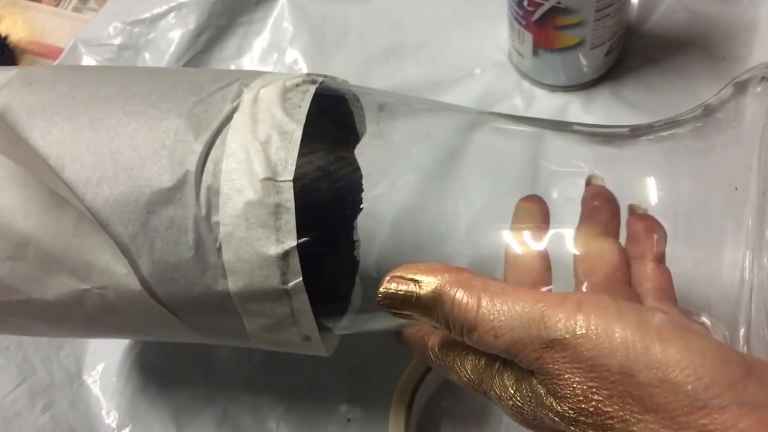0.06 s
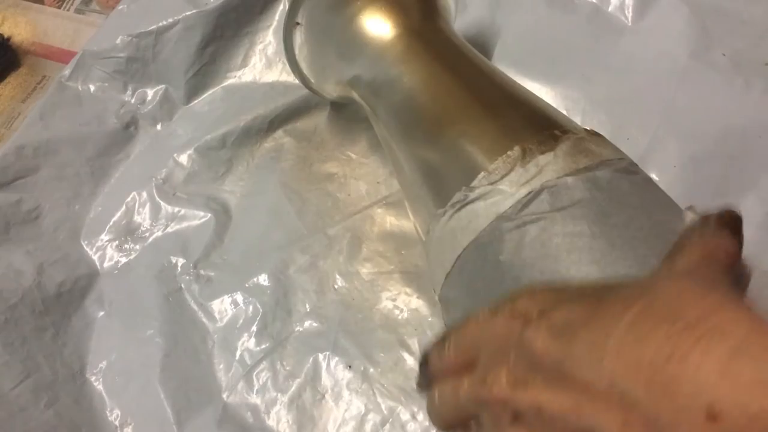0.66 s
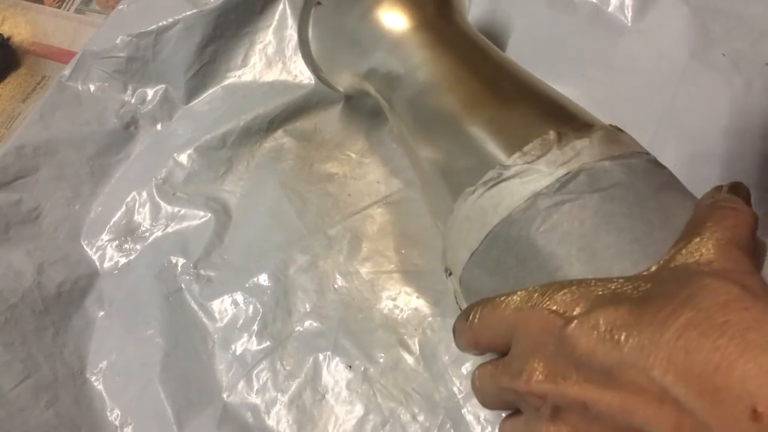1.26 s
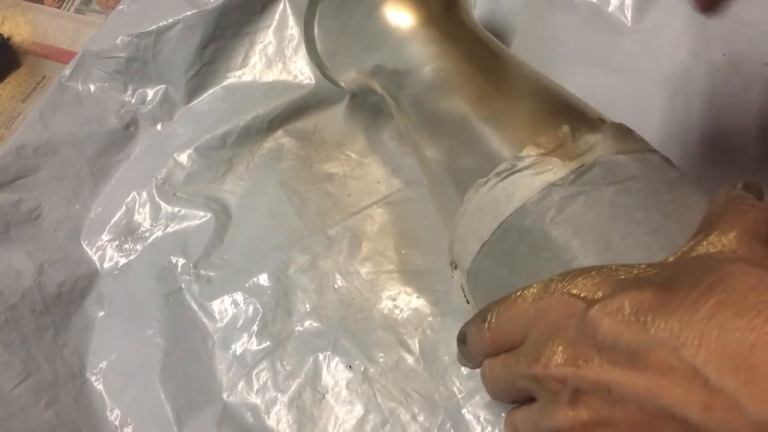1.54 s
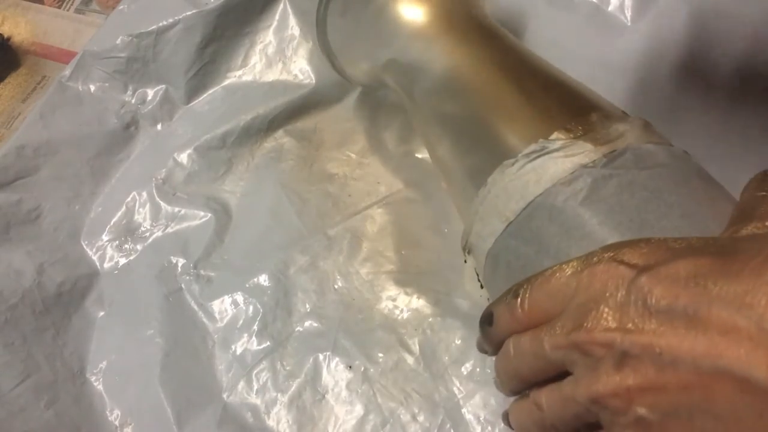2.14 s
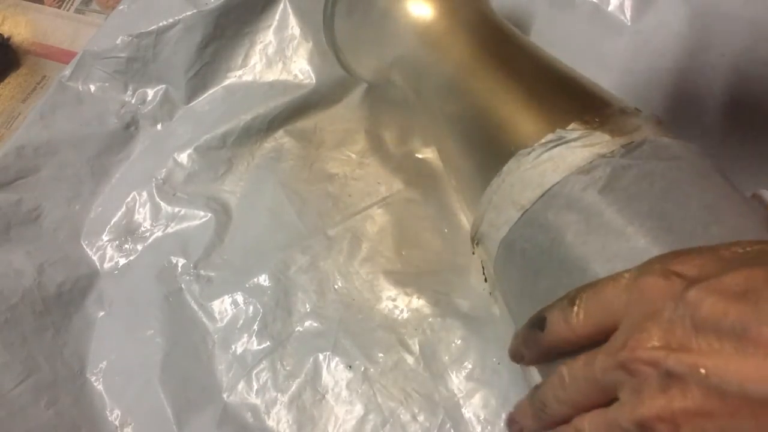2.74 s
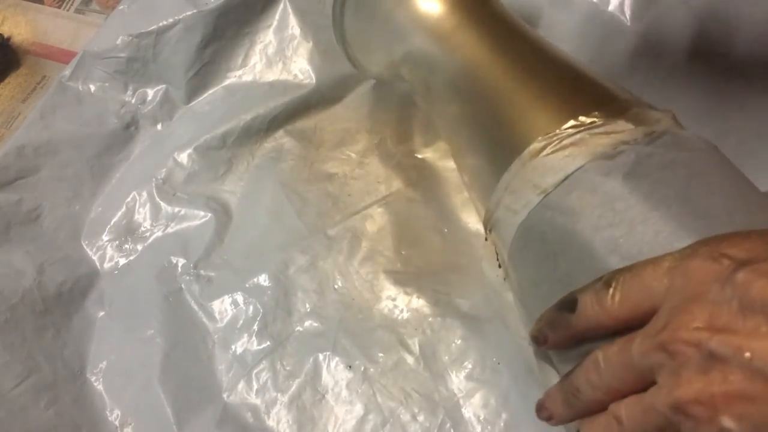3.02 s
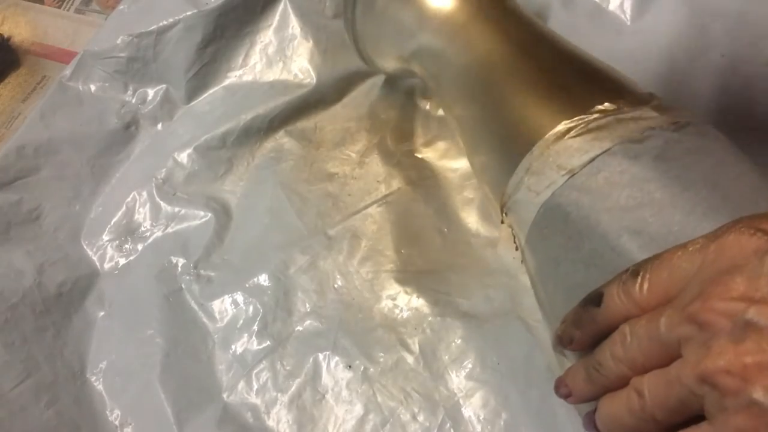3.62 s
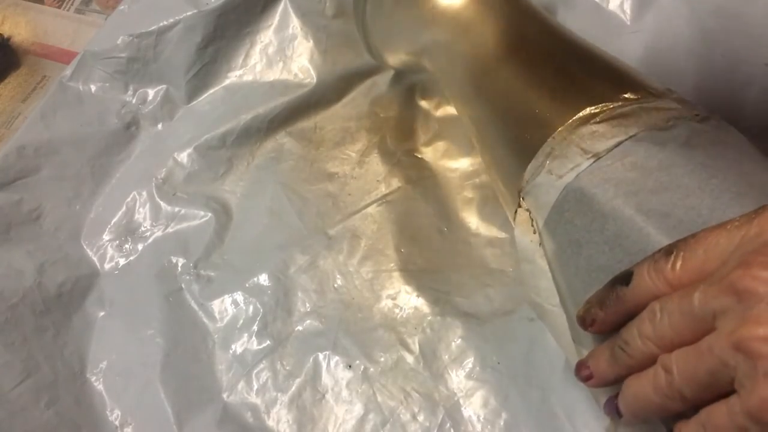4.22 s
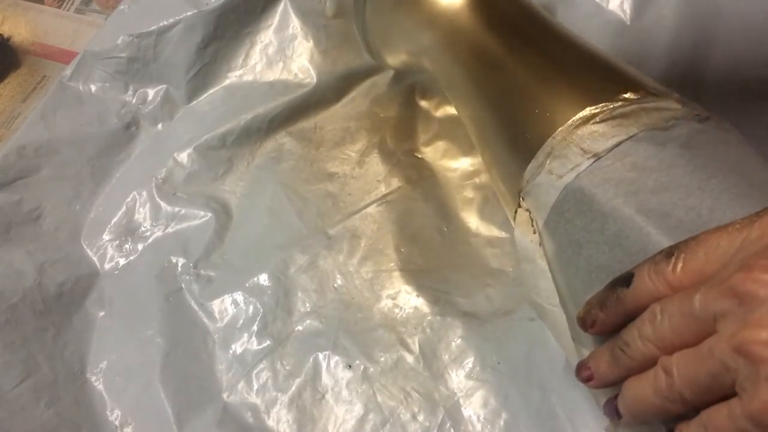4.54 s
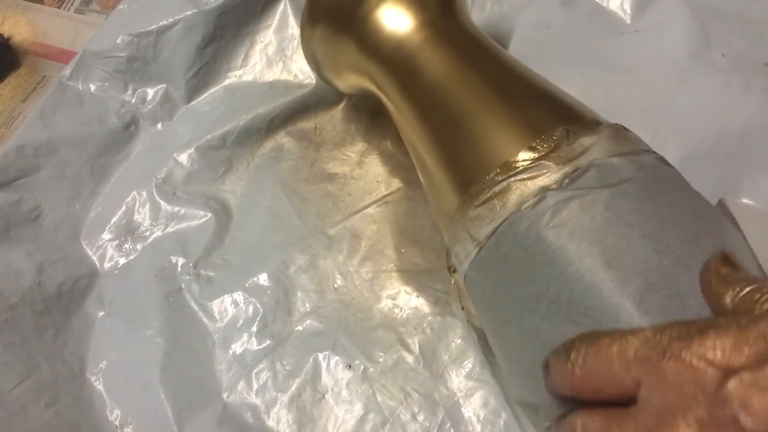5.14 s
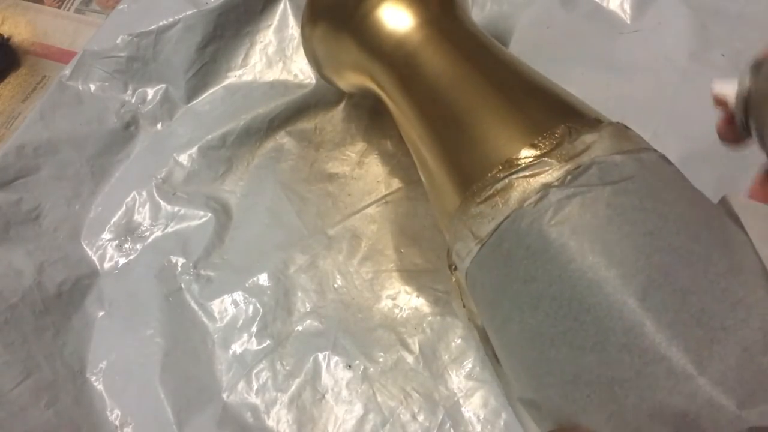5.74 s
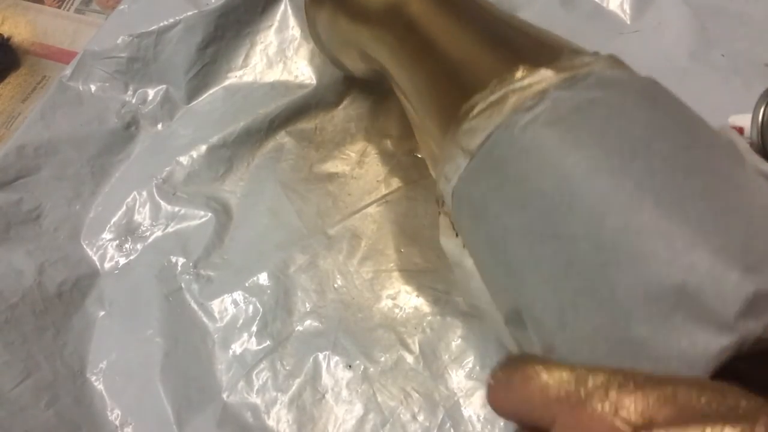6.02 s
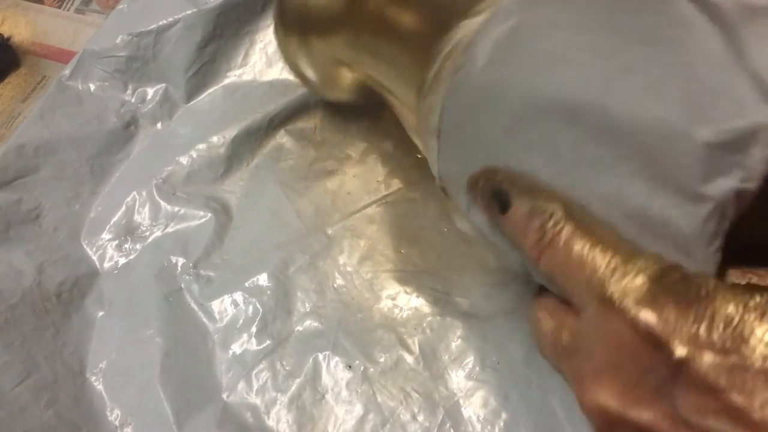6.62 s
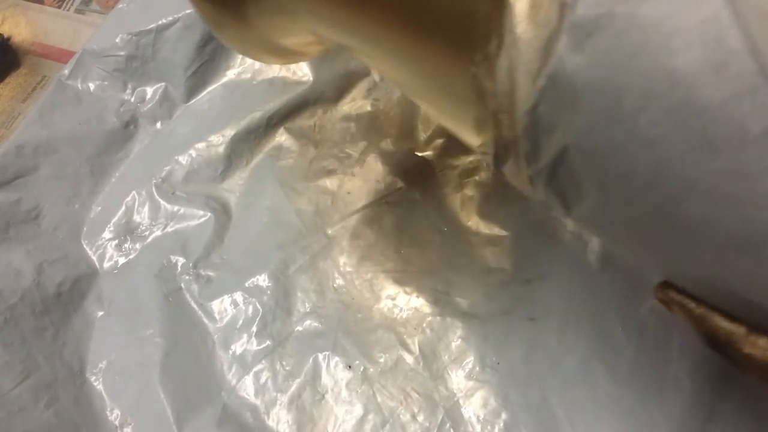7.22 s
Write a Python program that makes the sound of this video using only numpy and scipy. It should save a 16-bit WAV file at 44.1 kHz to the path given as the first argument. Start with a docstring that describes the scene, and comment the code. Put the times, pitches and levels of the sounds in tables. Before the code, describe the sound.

Paper and plastic crinkle softly as a wrapped glass vase is handled. A spray paint can then hisses steadily for about three seconds, its mixing ball clicking inside while creases snap sharply. After the spray cuts off, the ball rattles and rolls, and the vase is turned with more rustling and a few soft bumps on the table. The microphone is close, in a small, quiet room.

```python
"""A small workroom, one mono microphone close to a glass vase in a paper sleeve on a plastic sheet.
The vase gets one long burst of spray paint: the jet hisses, and echoes off nearby surfaces shift its
colour as the hand sweeps. The mixing ball knocks, bounces and rolls, ringing the can. As the vase is
turned, paper and plastic creases snap and rustle, and it bumps softly on the table. Faint room rumble
and mains hum lie underneath; early on, the sound drops out for a moment."""
import sys
import numpy as np
from scipy import signal
from scipy.fft import rfft, irfft, next_fast_len
from scipy.io import wavfile
from scipy.ndimage import uniform_filter1d, map_coordinates

SR = 44100
rng = np.random.default_rng(int(sys.argv[2]) if len(sys.argv) > 2 else 0)


def transcribe(signal):
    """Save signal, clipped to [-1, 1], as a 16-bit WAV file at the path in sys.argv[1]."""
    frames = np.atleast_2d(signal).T
    limited = np.clip(frames, -1, 1)
    pcm = np.round(limited * 32767).astype(np.int16)
    wavfile.write(sys.argv[1], SR, pcm)


N = 320607
TIME = np.arange(N) / SR

# spectra of the quiet room, crinkling creases, rubbing and the rumbling sleeve: f/Hz, relative level/dB
ROOM_SPECTRUM = [(25, -25), (38, -9.5), (52, -1), (80, -2), (120, -7.5), (170, -7), (260, -16.5),
                 (380, -23.5), (450, -13.5), (540, -24.5), (1400, -28), (2800, -35.5), (6000, -38.5),
                 (10000, -40.5), (16000, -43)]
CRINKLE_SPECTRUM = [(710, -26), (1200, 4), (2510, -1), (3180, 3.5), (4960, 1.5), (6370, -2.5), (8720, -1),
                    (10500, -11), (13600, -7), (16000, -17)]
RUB_SPECTRUM = [(250, -3), (450, -6.5), (700, 3.5), (1000, 7), (1400, 2), (2200, 0), (4000, -4.5)]
SLEEVE_SPECTRUM = [(100, -14), (170, -7.5), (250, -3.5), (330, 1.5), (420, -8), (600, -13), (1200, -16)]
# soft bumps on the table: t/s, level/dB, thump f/Hz, hollow knock trim/dB
BUMPS = [(0.402, -39.5, 137, -9), (0.88, -39.5, 114, -21.5), (5.547, -38.5, 133, -30),
         (6.239, -36.5, 330, -2.5), (6.355, -31, 307, -7)]
# the hand grips, shifts or turns the vase: start/s, end/s, sliding level/dB, relative weight/dB
HAND_MOVES = [(0.6, 0.688, -67.5, -1), (0.722, 0.747, -57, -4), (0.844, 1.079, -58, 1),
              (1.141, 1.199, -62, 0), (1.402, 1.489, -72, 0), (4.772, 4.863, -63, 4),
              (4.918, 5.132, -60, 3), (5.254, 5.328, -60.5, 2), (5.402, 5.618, -67.5, 1.5),
              (5.695, 5.878, -54.5, -3), (5.9, 6.12, -50.5, 1), (6.224, 6.259, -52.5, 6),
              (6.309, 6.36, -43.5, -1.5), (6.392, 6.56, -44, 0), (6.59, 6.7, -45, -0.5),
              (6.774, 6.839, -57, 0), (6.9, 7.031, -63.5, 4), (7.089, 7.248, -60, 3)]
# short scrapes of the sleeve, and one brief dull knock (last row): t/s, level/dB, length/s, f/Hz
SCRAPES_AND_KNOCK = [(0.729, -47, 0.022, 2180), (2.737, -33.5, 0.019, 3360), (5.276, -44.5, 0.046, 2000),
                     (6.16, -51.5, 0.15, 5460), (6.633, -34, 0.011, 860)]
# the main snaps of paper and plastic creases: t/s, level/dB, panel f/Hz, relative treble/dB
SNAPS = [(0.687, -44.5, 2285, -3.5), (0.701, -41, 2000, -7), (0.721, -39.5, 2165, -8),
         (0.734, -40.5, 2150, 1), (0.793, -34, 1960, 2.5), (0.883, -30.5, 4440, -3.5),
         (0.973, -32, 3830, -5), (1.052, -40, 6420, 10.5), (1.075, -37, 6090, 0), (1.15, -36, 2210, -5),
         (1.205, -38.5, 4050, -10), (1.23, -43.5, 4060, -15), (1.31, -47, 5600, -7.5),
         (1.366, -44.5, 2000, -25.5), (1.419, -43, 2050, -4.5), (1.461, -38.5, 3720, -13),
         (3.31, -13, 3870, 0.5), (3.563, -15.5, 4100, -25), (3.593, -20, 4180, -11),
         (3.615, -22, 4200, -4.5), (3.917, -20, 4400, -1), (3.948, -18.5, 5520, -7),
         (4.118, -18.5, 3360, -11), (4.176, -21, 3840, -20), (4.262, -16, 3080, -4),
         (4.433, -14.5, 3800, -3), (4.5, -22, 3730, -10), (4.577, -10.5, 3910, -1),
         (5.017, -39.5, 2240, -1.5), (5.102, -22.5, 3200, -3), (5.124, -32.5, 3530, -4),
         (5.171, -28.5, 3080, -0.5), (5.219, -39, 3520, -1), (5.809, -28.5, 1980, -8),
         (5.848, -28, 3810, -4.5), (5.894, -11.5, 5820, -3), (5.973, -32.5, 3200, -7.5),
         (6.0, -20.5, 7200, -5), (6.031, -22.5, 5550, -14.5), (6.062, -24.5, 5580, -8.5),
         (6.087, -28.5, 4100, 1.5), (6.099, -19, 4200, -6), (6.124, -35, 3010, 9.5),
         (6.145, -26.5, 5760, -13), (6.168, -30, 5620, -20), (6.301, -29, 8300, 3.5),
         (6.311, -28, 6660, -1), (6.319, -18, 7030, -7), (6.334, -30.5, 8780, 9), (6.354, -28.5, 8310, 1.5),
         (6.415, -26.5, 2000, 1.5), (6.423, -29.5, 8490, 4), (6.452, -32, 3520, 4),
         (6.521, -28.5, 5640, 9.5), (6.527, -25, 8630, -3), (6.555, -30.5, 3220, 1),
         (6.563, -26.5, 3100, 0), (6.657, -24.5, 8530, 0), (6.673, -23.5, 3320, -3), (6.715, -24, 6760, -3),
         (6.807, -37.5, 4200, 5), (6.844, -35, 3300, 1.5), (6.91, -40.5, 3980, -4),
         (7.073, -35.5, 4230, -4), (7.101, -35.5, 2680, -11), (7.213, -38.5, 1910, -19)]
# modes of the can: f/Hz, relative level/dB, t60/s before extra damping
CAN_MODES = [(960, -5, 0.053), (1270, -7, 0.038), (1590, -40, 0.013), (1728, 6.5, 0.05), (1850, 8.5, 0.022),
             (2170, -8, 0.048), (2430, -6.5, 0.038), (2800, -43, .012), (3490, -7, 0.012)]
# the ball rolls round the bottom of the can: start/s, end/s, level/dB
BALL_ROLLS = [(4.943, 5.801, -57), (5.9, 5.966, -54), (7.131, 7.27, -58.5)]
# the ball hits the can: t/s, level/dB, low mode trim/dB, tick trim/dB
BALL_KNOCKS = [(2.11, -30, -15, -9), (2.13, -30.5, -14, -13), (2.286, -36.5, -20, -3),
               (2.442, -34, -22, -7), (2.619, -31.5, -9, -12), (2.959, -27, 0, -12), (2.985, -30, -6, -9),
               (3.444, -19.5, -5.5, -15), (3.641, -24, -11, -7.5), (3.783, -16.5, 1, -12.5),
               (4.307, -25.5, -8, -9), (4.65, -24.5, -12, -14), (4.726, -21.5, 2, -11.5),
               (4.766, -27.5, -9.5, -12), (5.308, -20.5, -23, -5), (5.992, -25, -32, -7),
               (6.885, -30.5, -12.5, -5.5), (6.956, -29.5, -24, -3.5), (6.979, -33.5, -18, -15),
               (7.014, -31.5, -1.5, -7.5), (7.075, -34.5, -8, -21)]
# the ball bounces to rest: t/s, level/dB, low mode trim/dB, tick trim/dB, first gap/s, share of speed kept
BALL_RATTLES = [(4.828, -29, -8.5, -13, .035, .77), (5.357, -23, -19, -10.5, .049, .68)]
# spectra of the nozzle's hiss, the jet's rush and the paint's spatter: f/Hz, relative level/dB
NOZZLE_SPECTRUM = [(5000, -24), (6400, -5), (7200, -2.5), (8000, -5), (9000, -5), (10400, -6.5), (11100, 0),
                   (12000, 1.5), (13200, 1), (14500, 3), (16000, -7)]
RUSH_SPECTRUM = [(250, -11.5), (420, -14), (560, -18), (900, -8.5), (1250, -5), (1500, -8.5), (1880, -5),
                 (2200, -4.5), (2750, -5), (3250, 2.5), (4050, -0.5), (4600, -13), (6000, -13.5),
                 (9000, -16)]
SPATTER_SPECTRUM = [(3000, -30), (4400, -10), (5000, -19.5), (5600, -8.5), (6200, -27), (7000, -14),
                    (10000, -51)]
# where the jet points: t/s, aim from 0 (bare glass) to 1 (edge of the paper)
JET_AIM = [(1.7, 0.95), (2.2, 0.65), (2.8, 0.039), (3.4, 0.81), (3.85, 0.3), (4.1, .8), (4.7, 0.92)]
# echoes off surfaces beside the jet: delay/ms, gain, swing of the delay/ms
JET_ECHOES = [(.24, .3, .045), (.5, .3, .07), (.84, .38, .05), (1.17, .42, .05), (1.7, .22, .1)]

VALVE_OPEN_S, VALVE_SHUT_S = 1.516, 4.742
SOFT_SNAP_DB, SOFT_TICK_DB = -35, -11  # harder snaps and knocks change colour relative to these


def from_db(db):
    """Decibels to gain."""
    return 10 ** (np.asarray(db) / 20)


def rms_one(x):
    """Scale to unit rms."""
    return x / np.sqrt(np.mean(x ** 2) + 1e-20)


def crest_one(x):
    """Scale so that the loudest millisecond has unit rms."""
    return x / np.sqrt(uniform_filter1d(x ** 2, SR // 1000).max() + 1e-20)


def colour(x, spectrum):
    """Causal filter with the given spectrum, falling away past its ends; unit rms out."""
    size = next_fast_len(N + 4096)
    hz, db = np.transpose(spectrum)
    octave = np.log2(np.maximum(np.arange(size // 2 + 1) * SR / size, 1))
    octaves_outside = abs(octave - np.clip(octave, np.log2(hz[0]), np.log2(hz[-1])))
    gain = from_db(np.interp(octave, np.log2(hz), db) - 20 * np.minimum(octaves_outside, 2))
    cepstrum = irfft(np.log(gain), size)
    cepstrum[size // 2:] = 0  # minimum phase
    return rms_one(irfft(rfft(x, size) * np.exp(2 * rfft(cepstrum)), size)[:N])


def band(x, low_hz, high_hz):
    """Butterworth band-pass."""
    return signal.sosfilt(signal.butter(2, [low_hz, high_hz], "band", fs=SR, output="sos"), x)


def low_cut(x, hz):
    """Steep high-pass: small, light things radiate no bass."""
    return signal.sosfilt(signal.butter(4, hz, "high", fs=SR, output="sos"), x)


def ring(x, hz, t60):
    """Resonator: a unit click sets a sine of height 1 ringing."""
    radius, angle = from_db(-60 / (t60 * SR)), 2 * np.pi * hz / SR
    return signal.lfilter([0, np.sin(angle)], [1, -2 * radius * np.cos(angle), radius ** 2], x + 1e-18)


def noise(spectrum):
    """Steady noise with the given spectrum and unit rms."""
    return colour(rng.standard_normal(N), spectrum)


def drift(per_s):
    """Smooth random wander with unit rms."""
    knots = rng.standard_normal(2000)
    return rms_one(map_coordinates(knots, [TIME * per_s], order=2, mode="wrap"))


def grains(per_s, spread_db):
    """Random clicks of uneven size and sign."""
    sizes = from_db(spread_db * np.minimum(rng.exponential(1, N), 3.5))
    return (rng.random(N) < per_s / SR) * sizes * rng.choice([-1, 1], N)


def burst(decay_s, tail_db, tail_s, size=3000):
    """A sharp crack of noise with a weak tail; unit energy."""
    t = TIME[:size]
    x = rng.choice([-1, 1], size) * (np.exp(-t / decay_s) + from_db(tail_db) * np.exp(-t / tail_s))
    return x / np.linalg.norm(x)


def swell(start, end, rise_s, fall_s):
    """Gain that rises to 1 by the start, holds, and dies away after the end."""
    return np.exp(np.minimum(TIME - start, 0) / rise_s - np.maximum(TIME - end, 0) / fall_s)


def add(out, s, sound):
    """Mix a short sound in at time s."""
    at = int(s * SR)
    out[at:at + len(sound)] += sound[:N - at]


def room_tone(rumble_db=-61.5, hum_db=-64, hum_hz=100):
    """The room's own low rumble and mains hum."""
    hum = np.sqrt(2) * np.sin(2 * np.pi * hum_hz * TIME)
    return from_db(rumble_db) * noise(ROOM_SPECTRUM) + from_db(hum_db) * hum


def workroom(direct, t60=.18, tail_db=-17):
    """At close range the room adds only a weak, slightly dull diffuse tail."""
    t = TIME[:SR // 2]
    tail = band(rng.standard_normal(len(t)), 330, 15000) * from_db(-60 * t / t60) * (t > .004)
    return direct + from_db(tail_db) * signal.fftconvolve(direct, tail / np.linalg.norm(tail))[:N]


def table_bumps():
    """Dull contacts with the table: a low thump and a short hollow knock."""
    out = np.zeros(N)
    for s, db, hz, hollow_db in BUMPS:
        push = burst(decay_s=.007, tail_db=-22, tail_s=.015, size=6000)
        thump = from_db(-7) * crest_one(ring(band(push, 146, 570), hz, t60=.11))
        hollow = from_db(hollow_db + 3) * crest_one(band(push, 230, 410))
        add(out, s, from_db(db) * (thump + hollow))
    return out


def sheet_shake(soft_db=-61, decay_s=.014):
    """Gain of the rustle that each main snap leaves in the sheet, a little more after a hard one."""
    kicks = np.zeros(N)
    for s, db, _, _ in SNAPS:
        kicks[int(s * SR)] = from_db(soft_db + .23 * (db - SOFT_SNAP_DB))
    return signal.lfilter([1], [1, -np.exp(-1 / (decay_s * SR))], kicks + 1e-18)


def hand_effort():
    """Gains of the hand's sliding and of its weight on the sleeve, both on top of the sheet's shake."""
    slide = press = sheet_shake()
    for start, end, db, weight_db in HAND_MOVES:
        move = from_db(db) * swell(start, end, rise_s=.02, fall_s=.018)
        slide = slide + move
        press = press + from_db(weight_db) * move
    return slide, press


def handling():
    """Tiny creases crackle over a finer rustle while the sleeve rubs over the sheet and rumbles."""
    creases = grains(per_s=200, spread_db=3.5)
    crackle = signal.fftconvolve(creases, burst(decay_s=.0005, tail_db=-20, tail_s=.002))[:N]
    rustle = from_db(2.5 * drift(90)) * grains(per_s=3000, spread_db=3.5)
    crinkle = colour(rms_one(crackle) + .7 * rms_one(rustle), CRINKLE_SPECTRUM)
    rub = colour(from_db(3 * drift(70)) * grains(per_s=600, spread_db=3), RUB_SPECTRUM)
    rumble = colour(grains(per_s=300, spread_db=2.5), SLEEVE_SPECTRUM)
    slide, press = hand_effort()
    jerks = from_db(drift(45))  # the hand's pressure is uneven
    return slide * crinkle + press * jerks * (from_db(-3) * rub + from_db(-1.5) * rumble)


def scrapes_and_knock(q=4):
    """Short stick-slip rasps of the sleeve and one brief dull knock, each in one broad resonance."""
    clicks = grains(per_s=1400, spread_db=5.5)
    out = np.zeros(N)
    for s, db, length_s, hz in SCRAPES_AND_KNOCK:
        t60 = np.log(1000) * q / (np.pi * hz)
        resonance = rms_one(low_cut(ring(clicks, hz, t60), hz / 2))
        out += from_db(db) * np.exp(-(2 * (TIME - s) / length_s) ** 2) * resonance
    return out


def small_snaps(count=110, low_hz=2080, high_hz=8100, above_slide_db=9.5, spread_db=3.5, treble_db=-1):
    """Lesser creases give way at random, more often and louder as the hand speeds up; rows like SNAPS."""
    slide, _ = hand_effort()
    strain = np.cumsum(slide ** .6)
    when, strength, pitch = rng.random((count, 3)).T
    at = np.searchsorted(strain, (np.arange(count) + when) / count * strain[-1])
    db = 20 * np.log10(slide[at]) + above_slide_db + spread_db * (2 * strength - 1)
    hz = low_hz * (high_hz / low_hz) ** pitch
    return list(zip(at / SR, db, hz, np.full(count, treble_db)))


def crease_snaps():
    """A crease flips over: a broad crack, and the panel beside it rings briefly."""
    out = np.zeros(N)
    for s, db, hz, treble_db in list(SNAPS) + small_snaps():
        crack = burst(decay_s=.0004, tail_db=-7.5, tail_s=.0028)
        panel = from_db(1.5) * crest_one(ring(crack, hz, t60=.005))
        body = crest_one(crest_one(band(crack, 2530, 5900)) + panel)
        low = crest_one(band(burst(decay_s=.0038, tail_db=-29, tail_s=.002), 1230, 2520))
        treble = crest_one(band(burst(decay_s=.00068, tail_db=-5, tail_s=.0031), 4800, 13100))
        low_db = -9 - .39 * max(db - SOFT_SNAP_DB, 0)  # hard snaps are thinner
        add(out, s, from_db(db) * (body + from_db(low_db) * low + from_db(treble_db) * treble))
    return low_cut(out, 800)


def ball_rolling():
    """The rolling ball keeps the can's modes murmuring, and damps them by its touch."""
    contact = grains(per_s=2500, spread_db=1.5)
    modes = sum((-1) ** k * from_db(db) * ring(contact, hz, t60=.004)
                for k, (hz, db, _) in enumerate(CAN_MODES))
    speed = sum(from_db(db) * swell(start, end, rise_s=.032, fall_s=.062)
                for start, end, db in BALL_ROLLS)
    return speed * rms_one(band(modes, 900, 1780))


def ball_bounces(count=7):
    """The settling ball loses speed, so it hits ever sooner and softer; rows like BALL_KNOCKS."""
    return [(s + gap_s * np.sum(kept ** np.arange(k)), db + 20 * np.log10(kept ** k), low_db, tick_db)
            for s, db, low_db, tick_db, gap_s, kept in BALL_RATTLES for k in range(count)]


def ball_knocks(longest_t60=.036):
    """The ball strikes with a tick and rings the can's modes, which the paint damps and detunes."""
    out = np.zeros(N)
    for s, db, low_db, tick_db in list(BALL_KNOCKS) + ball_bounces():
        contact = burst(decay_s=.001, tail_db=-13, tail_s=.003)
        chatter = contact.copy()
        if s < VALVE_SHUT_S:  # while the can is waved, the ball bounces again after each hit
            rebound_s = rng.uniform(.008, .016)
            add(chatter, rebound_s, .15 * burst(decay_s=.002, tail_db=-13, tail_s=.004, size=1500))
        sharpness_db = tick_db - SOFT_TICK_DB  # sharper contacts ring higher and brighter
        pitch = 1 + .02 * sharpness_db
        modes = 0
        for hz, mode_db, t60 in CAN_MODES:
            lift_db = (hz < 1350) * (low_db + 14) + (2000 < hz < 2600) * .73 * sharpness_db
            strength = from_db(mode_db + lift_db + rng.normal(0, 2))
            detuned_hz = hz * pitch * rng.normal(1, .025)
            modes += strength * crest_one(ring(chatter, detuned_hz, min(t60, longest_t60)))
        clack = from_db(-7) * crest_one(band(chatter, 1200, 2300))
        tick = from_db(tick_db + 6) * crest_one(band(contact, 4200, 9100))
        add(out, s, from_db(db) * (from_db(-1) * crest_one(modes) + clack + tick))
    return low_cut(out, 880)


def paint_jet():
    """Nozzle hiss, rush and spatter; aiming from the glass to the paper trades rush for spatter."""
    held_s = np.maximum(TIME - VALVE_OPEN_S, 0)
    aim = np.interp(TIME, *np.transpose(JET_AIM))
    cooling_db = -.38 * held_s  # the hiss sinks as the can cools
    spurt_db = 10 * np.exp(-held_s / .076)  # the first paint leaves in a wet spurt
    hiss = from_db(-35.23 + cooling_db) * noise(NOZZLE_SPECTRUM)
    rush = from_db(-39 - 3.5 * aim + spurt_db) * noise(RUSH_SPECTRUM)
    spatter = from_db(-55.5 + 10.5 * aim) * noise(SPATTER_SPECTRUM)
    return hiss + rush + spatter


def spray(rise_s=.034, fall_s=.042, flutter_db=1.14):
    """The valve lets the jet out; nearby echoes shift as the hand sweeps, so comb colours glide."""
    jet = paint_jet()
    sweep = drift(11)
    treble = band(jet, 5500, 19000)  # only the treble comes from a point small enough to comb
    for delay_ms, gain, swing_ms in JET_ECHOES:
        lag = (delay_ms + swing_ms * (.8 * sweep + .6 * drift(19))) * SR / 1000
        jet += gain * map_coordinates(treble, [np.arange(N) - lag], order=3)
    valve = np.clip(np.minimum((TIME - VALVE_OPEN_S) / rise_s, (VALVE_SHUT_S - TIME) / fall_s), 0, 1)
    return jet * valve ** 2 * from_db(flutter_db * drift(60))


def scene():
    """Can and vase close to the microphone, over the room tone; both channels alike."""
    background = room_tone()
    direct = spray() + crease_snaps() + ball_knocks() + ball_rolling()
    direct += handling() + scrapes_and_knock() + table_bumps()
    mono = workroom(direct) + background
    return np.array([mono, mono])


def record(dry):
    """The sound drops out for a moment early on; the hardest snaps are rounded and the top is cut."""
    gap_start_s, gap_end_s = .434, .48
    ceiling, cutoff_hz = .75, 16000
    gate = uniform_filter1d(1.0 * ((TIME < gap_start_s) | (TIME > gap_end_s)), size=64)
    rounded = ceiling * np.tanh(dry * gate / ceiling)
    return signal.sosfilt(signal.ellip(12, .1, 70, cutoff_hz, fs=SR, output="sos"), rounded)


dry = scene()
out = record(dry)
transcribe(out)
```